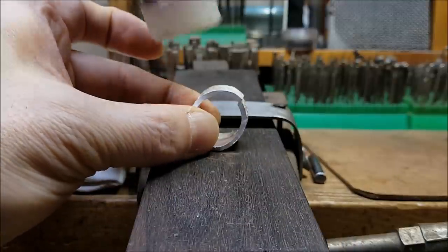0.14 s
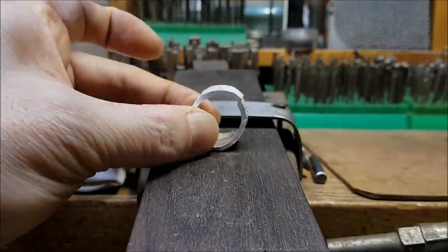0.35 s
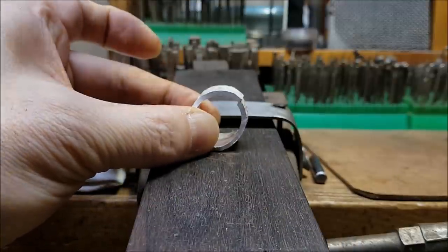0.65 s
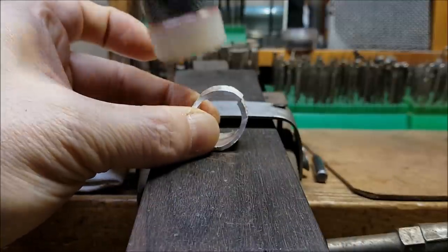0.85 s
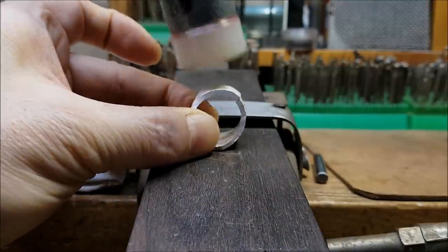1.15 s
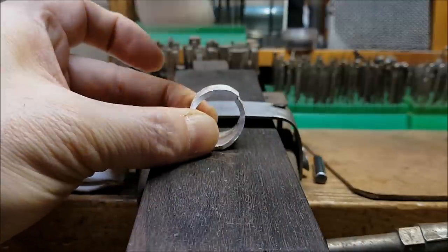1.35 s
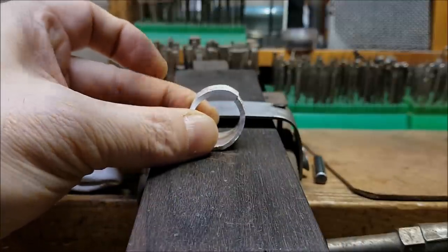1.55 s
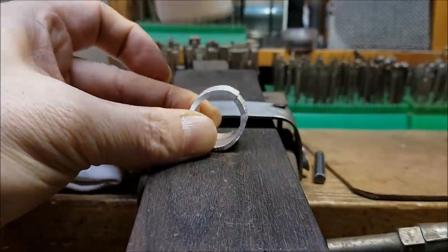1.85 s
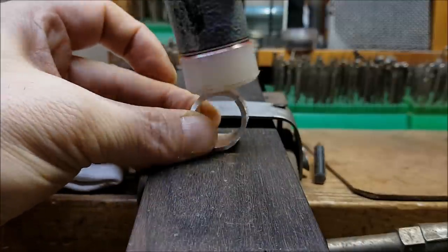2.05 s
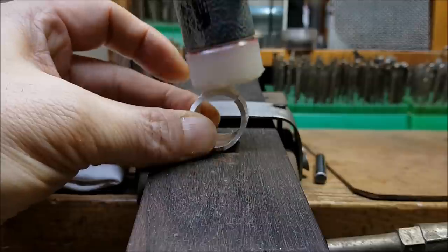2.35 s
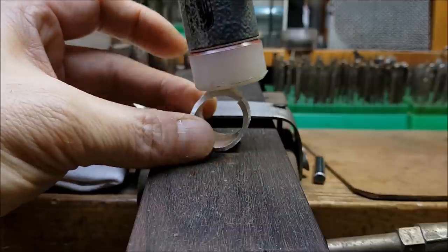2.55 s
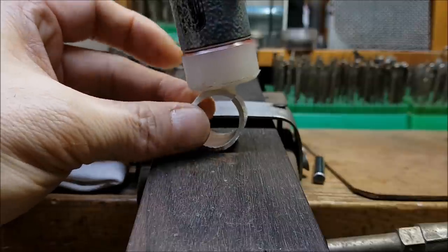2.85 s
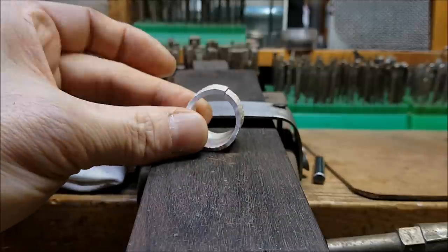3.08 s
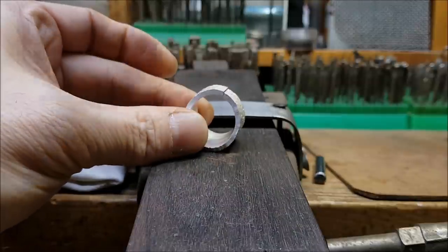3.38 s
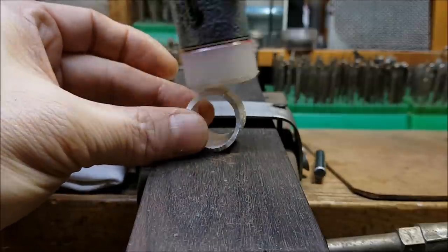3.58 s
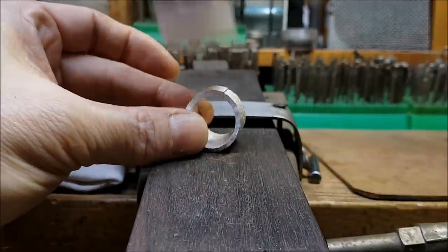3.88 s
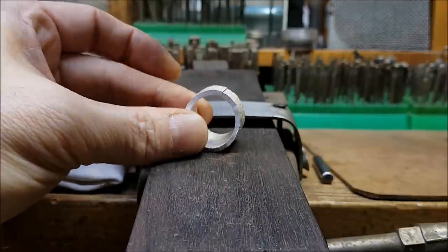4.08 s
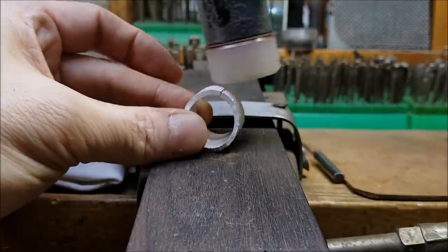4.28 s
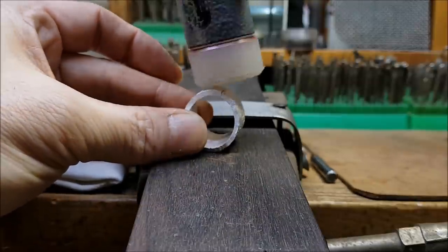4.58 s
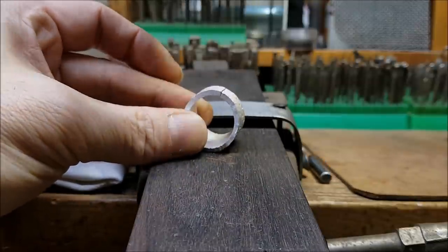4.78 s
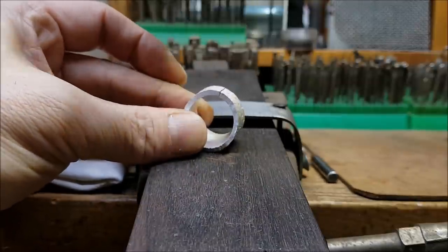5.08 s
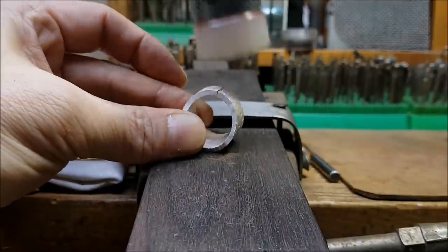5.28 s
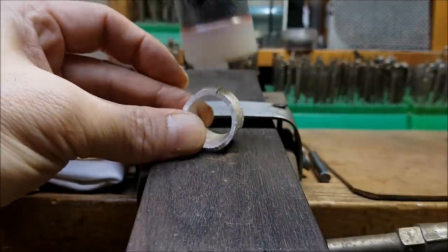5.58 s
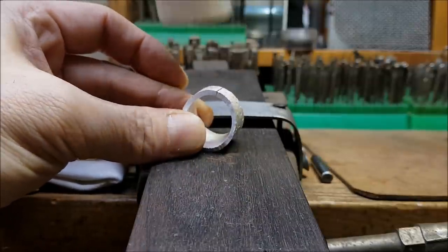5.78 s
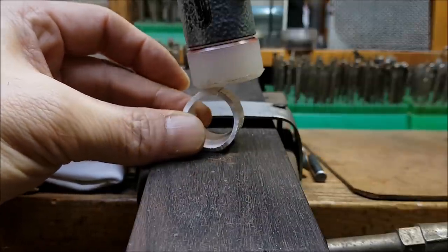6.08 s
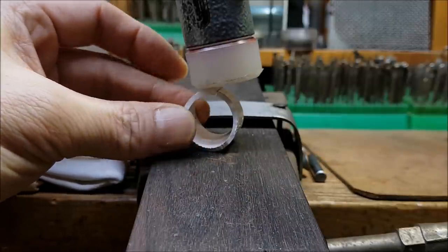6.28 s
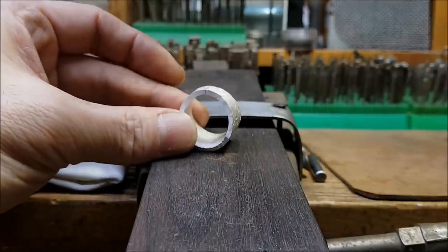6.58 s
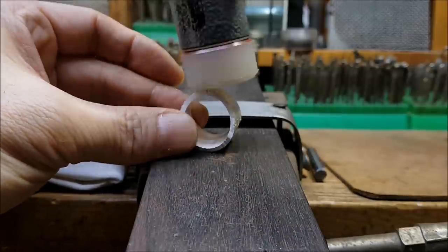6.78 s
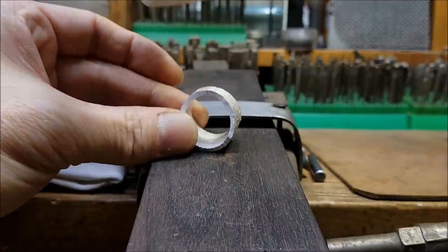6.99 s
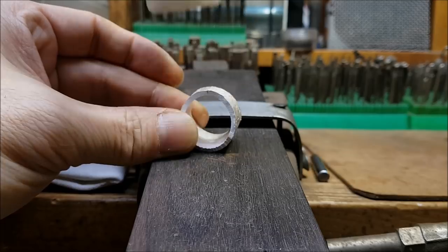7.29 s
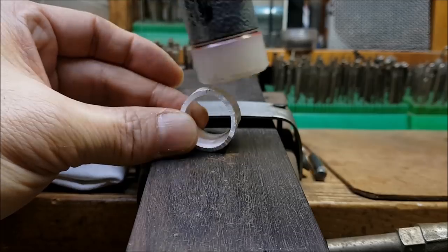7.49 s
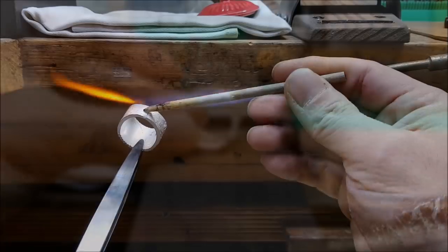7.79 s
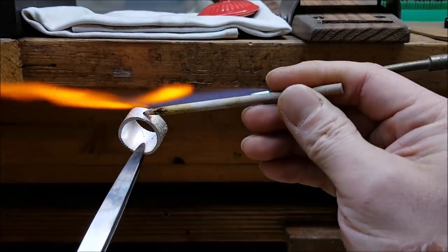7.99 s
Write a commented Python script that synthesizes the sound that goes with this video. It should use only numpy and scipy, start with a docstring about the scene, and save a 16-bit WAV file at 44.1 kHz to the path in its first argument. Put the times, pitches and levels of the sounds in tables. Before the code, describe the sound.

Close, steady mallet taps on a metal ring thump a workbench and rattle loose tools, pausing twice before a gas torch suddenly hisses.

```python
"""In a small, dry workshop, close by and a little to the left, a plastic mallet taps a silver ring on a
jeweller's wooden bench peg. Each blow clinks the ring and thumps the bench; loose steel tools then
bounce, rock and lie still. After eight blows a hand turns the ring, so the next twelve clink differently.
Near the end a gas torch starts abruptly and hisses. A faint room rumble lies under it all."""
import sys
import numpy as np
from scipy import signal
from scipy.fft import rfft, irfft, next_fast_len
from scipy.io import wavfile

SR = 44100
rng = np.random.default_rng(int(sys.argv[2]) if len(sys.argv) > 2 else 0)


def int16_out(signal):
    """Quantize to a 16-bit WAV file."""
    q = np.round(np.clip(np.atleast_2d(signal).T, -1, 1) * 32767)
    wavfile.write(sys.argv[1], SR, q.astype(np.int16))


N = 358974
T = np.arange(SR // 3) / SR  # the clock of one short sound, in seconds

# A "t60" is the time a sound takes to fade by 60 dB. Levels in the tables are relative.
# Mallet blows. Each row: start in seconds, thump in dB, clink in dB, clink brightness in dB per octave,
# the tools' first flight in seconds, each flight as a fraction of the last, first landing in dB,
# rocking time in seconds, rocking level in dB.
BLOWS = [(0.095, -15.5, -16, -10, .042, 0.7, -13, 0.22, -40.5),
         (0.4775, -13, -16, -4, 0.066, 0.63, -18.5, 0.28, -41),
         (0.793, -14.5, -18.5, -1, 0.061, 0.49, -22.5, 0.26, -44),
         (1.1051, -18.5, -18, 1.5, 0.056, 0.75, -23, 0.29, -44),
         (1.4371, -18.5, -20.5, -1, 0.048, 0.55, -31.5, .26, -43.5),
         (1.7624, -17.5, -19.5, .5, 0.067, 0.85, -32.5, 0.41, -53.5),
         (2.0793, -17, -17, 0, 0.071, 0.89, -27, 0.41, -54.5),
         (2.4033, -28.5, -25.5, -14.5, 0.025, .9, -28, 0.15, -47.5),
         (3.282, -13, -17.5, 4.5, .06, 0.78, -14.5, .24, -37),
         (3.6207, -14.5, -16.5, -1, 0.058, 0.69, -17.5, .18, -41.5),
         (3.9602, -17, -15.5, -1, 0.055, 0.67, -27.5, 0.16, -42),
         (4.2784, -17, -17.5, 0, 0.056, 0.44, -21.5, .22, -40.5),
         (4.584, -17.5, -17.5, -.5, .06, .62, -25, .14, -50),
         (4.8955, -18.5, -16, 0, .055, .74, -24.5, .15, -50.5),
         (5.212, -19.5, -20, 0.5, 0.057, .8, -26, .2, -48),
         (5.5284, -19, -18, 0.5, 0.054, 0.88, -36.5, .29, -52),
         (5.8834, -20.5, -18.5, -2.5, 0.056, 0.64, -24, .15, -46),
         (6.8124, -15, -16, -.5, 0.061, 0.3, -25, 0.11, -49),
         (7.1321, -15.5, -13.5, -3.5, 0.048, 0.37, -21.5, 0.095, -36),
         (7.4914, -15, -18.5, -1, 0.059, 0.69, -22.5, 0.16, -46)]
# Small events. Each row: start in seconds, level in dB.
RING_SHIFTS = [(3.935, -52), (3.997, -35), (5.417, -37.5)]  # the ring clicks against the peg
HAND_TOUCHES = [(2.926, -60), (5.15, -66.5), (6.265, -75), (6.44, -67.5)]  # fingers handle the ring

# Bands of the clink, each dying faster than the one below. Each row: low edge in Hz, high edge in Hz.
CLINK_BANDS = [(1800, 3600), (3600, 5500), (5500, 9000), (9000, 11500), (11500, 16000)]
# The modes (natural tones) of bench and peg.
# Each row: pitch in Hz, left level in dB, right level in dB, t60 in seconds, swell time in seconds.
BENCH_MODES = [(52, -23.5, -31, 0.38, .005), (98.6, -17, -12.5, 0.11, 0.00076), (147.35, 3, 4, 0.19, .007),
               (199.5, 4.5, 9.5, 0.15, 0.0084), (225.8, 1, 2, 0.2, 0.013), (258.7, 4, 2.5, 0.12, 0.0066),
               (317.7, 4.5, 3.5, 0.11, .012), (369.7, 4, -5.5, 0.15, 0.0029), (407.6, -11, -15, 0.19, .02),
               (462.9, 2.5, 3, 0.11, 0.011), (590.6, -10, -12, 0.15, 0.0037),
               (674, -11.5, -13.5, .18, 0.00074), (768, -18.5, -20, 0.24, 0.0091),
               (928, -12, -23.5, .22, 0.0019), (1166, -14.5, -24, 0.14, 0.0019),
               (1217, -22.5, -19, 0.051, 0.0053), (1460, -6.5, -22.5, 0.13, 0.0023)]
# Steel that sings on. Each row: pitch in Hz, level against the thump in dB, t60 in seconds.
SINGING_MODES = [(1720, -57, 1.1), (2140, -56, 1), (3570, -49, 0.36)]

# Tone colours. Each row: frequency in Hz, level at that frequency in dB.
CLINK_COLOUR = [(1800, 1), (4800, -0.5), (5200, -5.5), (6000, 0), (9000, -5.5), (14000, -6), (16000, -20)]  # the struck ring
CLICK_COLOUR = [(1500, -28.5), (3000, -3.5), (5000, -3), (9500, -1), (13000, -13), (16000, -27)]  # a light click of silver
WOOD_COLOUR = [(30, -30), (100, -11), (300, 4), (600, 2), (900, -5), (1300, -8), (1800, -11), (2600, -19),
               (5000, -40)]  # the many close modes of the wood
CLACK_COLOUR = [(60, -24), (200, 7), (380, 3), (600, -3), (1500, 2.5), (2400, 3.5), (3100, -1.5),
                (3500, -10), (4800, -10.5), (5200, -16), (7000, -14.5), (9000, -26), (13500, -25),
                (16000, -41.5)]  # a steel tool landing on wood
ROCKING_COLOUR = [(100, -10.5), (250, -1.5), (380, 1.5), (560, -2.5), (1150, 3), (2300, -2), (2800, -4),
                  (3150, -16), (3600, -18.5), (4700, -27), (8000, -29), (16000, -42.5)]  # tools rocking gently on wood
JET_COLOUR = [(40, -27), (250, -16.5), (600, -18.5), (1000, -7.5), (1700, -3.5), (3300, -1), (4700, -4),
              (5600, -4), (7600, 3), (8800, -3.5), (12000, -8), (14600, -8.5), (15200, -14), (15800, -38.5)]  # the gas jet
RUMBLE_COLOUR = [(20, -20.5), (36, -10), (53, 2.5), (65, -4.5), (80, -6), (130, -11), (200, -22),
                 (400, -33.5), (900, -64)]  # the room's rumble
AIR_COLOUR = [(100, -12), (400, -4.5), (1000, -9.5), (3000, -14), (6000, -25.5), (16000, -24)]  # the room's air noise

# Resonances. Each row: centre in Hz, width in Hz, boost in dB (a negative boost is a dip).
RING_PEAKS = [(2083, 100, 12), (2830, 240, 4.5), (4030, 320, 6), (4650, 210, 6), (7110, 250, 9.5),
              (7570, 230, 4), (11930, 1900, 4.5)]  # the ring under the mallet
FIRST_SPOT_PEAKS = [(2080, 250, -4), (3000, 600, 4), (4300, 980, -6), (13000, 2000, 10)]  # added until the ring is turned: more near 3 and 13 kHz
STEEL_PEAKS = [(920, 46, 7.5), (1600, 120, 5), (2670, 160, 10.5), (2940, 210, 8), (3970, 290, 4)]  # the steel tools
BENCH_PEAKS = [(363, 130, 8), (770, 60, 5), (920, 60, 7), (1460, 66, 4.5)]  # the bench under the rocking tools
TUBE_PEAKS = [(1910, 140, 10.5), (2260, 150, -9), (2656, 60, 11.5), (2850, 150, 7), (3466, 110, 9.5),
              (3765, 95, 12), (4360, 71, 10), (5550, 150, 7), (6130, 130, 9.5), (6530, 180, 7),
              (7200, 200, 12.5), (7500, 150, 7.5), (8400, 90, 6), (9800, 250, 9.5), (10960, 440, 6.5),
              (13000, 290, 6.5), (14000, 510, 6)]  # the torch's tube

# Left-right balance. Each row: frequency in Hz, left minus right in dB.
WORK_PAN = [(200, 0.5), (1500, 3), (2800, 7), (4200, 1), (5600, 1), (7200, 7.5), (13000, 10)]  # ring and tools
JET_PAN = [(100, -3.5), (400, 4), (1300, 0), (2400, -1), (3500, 6), (4800, 1), (7200, 13.5), (15000, 16)]  # torch
# How long the room rings. Each row: frequency in Hz, t60 in seconds.
ROOM_DECAY = [(200, 0.51), (1000, 0.068), (2800, 0.15), (6000, 0.14), (14000, 0.09)]


def silver_ring(clink_db=3, turn_s=3, pivot_hz=5500):
    """The held ring clinks briefly, its tone set by where the mallet lands; it also clicks on the peg."""
    clinks, clicks = np.zeros((2, 2, N))
    grid = np.fft.rfftfreq(len(T), 1 / SR)
    for start, _, db, tilt, *_ in BLOWS:
        modes = colour(CLINK_COLOUR, RING_PEAKS + FIRST_SPOT_PEAKS if start < turn_s else RING_PEAKS)
        tone = lambda hz: modes(hz) * amp(tilt * np.log2((hz + 1) / pivot_hz))
        shares = np.array([np.linalg.norm(tone(grid[(grid >= lo) & (grid < hi)]))
                           for lo, hi in CLINK_BANDS])
        for (lo, hi), share in zip(CLINK_BANDS, shares / np.linalg.norm(shares)):
            band = lambda hz: tone(hz) * (hz >= lo) * (hz < hi)
            clink, = bursts(band, t60=0.036 * (lo / 1800) ** -.4, rise_s=0.00027)
            add(clinks, start, amp(db + clink_db) * share * clink)
    for start, db in RING_SHIFTS:
        click, = bursts(colour(CLICK_COLOUR), t60=0.04, rise_s=0.0012)
        add(clicks, start, amp(db) * click)
    return in_room(panned(clinks, WORK_PAN), wet_db=-8) + panned(clicks, WORK_PAN)


def bench(modes_db=-1, knock_db=2, boom_db=-5, boom_peak_s=.021, split_hz=580):
    """Each blow shakes the same bench modes; neighbours start in opposite directions, so the thump swells."""
    out = np.zeros((2, N))
    hz, left_db, right_db, t60, swell_s = np.transpose(BENCH_MODES)
    signs = (-1) ** np.arange(len(hz))[:, None]
    modes = signs * np.sin(2 * np.pi * hz[:, None] * T) * rise_and_fade(t60[:, None], swell_s[:, None])
    size = (len(BLOWS), 2, len(T))
    wood = colour(WOOD_COLOUR)
    highs = lambda f: 1 / (1 + (split_hz / (f + 1)) ** 8)
    knocks = noise(lambda f: wood(f) * highs(f), size) * rise_and_fade(t60=0.13, rise_s=0.011)
    # long bending waves are slow, so the low boom spreads over the bench top later
    late_swell = (T / boom_peak_s * np.exp(1 - T / boom_peak_s)) ** 3
    booms = noise(lambda f: wood(f) * (1 - highs(f)) * (f > 240), size) * late_swell
    for (start, db, *_), knock, boom in zip(BLOWS, knocks, booms):
        tones = amp(np.array([left_db, right_db]) + rng.standard_normal(len(hz))) @ modes
        thump = amp(modes_db) * tones + amp(knock_db) * knock + amp(boom_db) * boom
        add(out, start, amp(db) * thump)
    return out


def bouncing_tools(landings=6, shortest_flight_s=.019, pitch_spread=0.04, dull_db=-28):
    """Each blow throws the tools up; they land ever sooner and softer, each time on another edge."""
    out = np.zeros((2, N))
    steel = colour(CLACK_COLOUR, STEEL_PEAKS)
    for start, _, _, _, first_flight_s, rebound, first_db, *_ in BLOWS:
        shrink = rebound ** np.arange(landings)
        flights = first_flight_s * shrink
        gains = amp(first_db) * shrink ** 2.39  # a shorter flight lands much more softly
        pitches = np.exp(pitch_spread * rng.standard_normal(landings))
        knocks = bursts(colour(ROCKING_COLOUR, BENCH_PEAKS), t60=.06, rise_s=.0004, count=landings)
        for delay, flight, gain, pitch, knock in zip(np.cumsum(flights), flights, gains, pitches, knocks):
            clack, = bursts(lambda hz: steel(hz / pitch), t60=0.028, rise_s=0.0003)
            if flight > shortest_flight_s:
                # the knock weakens more slowly than the clack, so soft landings sound duller
                add(out, start + delay, gain * clack + amp(dull_db) * gain ** .4 * knock)
    return out


def rocking_tools(wait_s=0.05, fall_db=6, scatter_db=2):
    """The tools rock in soft, dull knocks until they lie still."""
    out = np.zeros((2, N))
    for start, *_, rocking_s, level_db in BLOWS:
        delays = wait_s + np.cumsum(rng.uniform(.016, .032, size=18))
        levels_db = level_db + fall_db * (.5 - delays / rocking_s)
        levels_db += scatter_db * rng.standard_normal(len(delays))
        knocks = bursts(colour(ROCKING_COLOUR, BENCH_PEAKS), t60=0.077, rise_s=.0005, count=len(delays))
        for delay, db, knock in zip(delays, levels_db, knocks):
            if delay < rocking_s:
                add(out, start + delay, amp(db) * knock)
    return out


def torch(start_s=7.647, opening_s=0.0018, jet_db=-21.5):
    """Gas rushes steadily through the nozzle and whistles faintly in the torch's tube."""
    opened = np.clip((np.arange(N) / SR - start_s) / opening_s, 0, 1)
    hiss = noise(colour(JET_COLOUR, TUBE_PEAKS), (2, N))
    return amp(jet_db) * opened * panned(hiss, JET_PAN)


def singing_steel(width_hz=45):
    """Steel on the bench loses its energy slowly, so it sings on faintly after each thump."""
    out = np.zeros((2, N))
    t = np.arange(2 * len(T)) / SR
    for hz, db, t60 in SINGING_MODES:
        tones = noise(lambda f: peak(f, hz, width_hz), (len(BLOWS), 2, len(t))) * fade(t, t60)
        for (start, thump_db, *_), tone in zip(BLOWS, tones):
            add(out, start, amp(thump_db + db) * tone)
    return out


def hand():
    """Fingers press the ring onto the wood with a slow, muffled bump."""
    out = np.zeros((2, N))
    for start, db in HAND_TOUCHES:
        bump, = bursts(colour(WOOD_COLOUR), t60=0.093, rise_s=.008)
        add(out, start, amp(db) * bump)
    return out


def workshop(steady_db=-65, swell_db=-49, fall_db_per_s=17, air_db=-81):
    """A low rumble, nearly alike on both sides, settles to a steady level, with very faint air noise."""
    level = amp(steady_db) + amp(swell_db - fall_db_per_s * np.arange(N) / SR)
    shared = noise(colour(RUMBLE_COLOUR), (1, N))
    sides = amp(-9) * noise(colour(RUMBLE_COLOUR), (2, N))
    return level * (shared + sides) + amp(air_db) * noise(colour(AIR_COLOUR), (2, N))


def in_room(x, wet_db):
    """Adds quick echoes from bench top and walls, which differ in detail from moment to moment."""
    out = x.copy()
    for first in range(0, N, len(T)):
        hz, t, spectrum = signal.stft(rng.standard_normal((2, len(T))), SR, nperseg=256)
        tail = signal.istft(spectrum * fade(t, along(ROOM_DECAY, hz)[:, None]), SR, nperseg=256)[1]
        tail = np.pad(tail / np.linalg.norm(tail[0]), ((0, 0), (SR // 400, 0)))  # arrives 2.5 ms late
        echoes = signal.fftconvolve(x[:, first:first + len(T)], tail, axes=1)
        add(out, first / SR, amp(wet_db) * echoes)
    return out


def bursts(response, t60, rise_s, count=1):
    """Short stereo bursts of noise, like many close modes struck at once, all equal in energy."""
    shape = rise_and_fade(t60, rise_s)
    shape = shape[:len(T) // 5] / shape.max()
    x = noise(response, (count, 2, len(shape))) * shape
    return x * np.linalg.norm(shape) / np.linalg.norm(x, axis=-1, keepdims=True)


def amp(db):
    """Turns decibels into a gain."""
    return 10 ** (np.asarray(db) / 20)


def fade(t, t60):
    """Falls by 60 dB every t60 seconds."""
    return np.exp(-np.log(1000) * t / t60)


def rise_and_fade(t60, rise_s):
    """The outline of a knock: it builds up, then dies away."""
    return (1 - np.exp(-T / rise_s)) * fade(T, t60)


def along(points, hz):
    """Reads between a table's rows on a logarithmic frequency scale."""
    frequencies, values = np.transpose(points)
    return np.interp(np.log(hz + 1), np.log(frequencies + 1), values)


def peak(hz, centre, width):
    """The hump of one resonance, 1 at its centre."""
    return 1 / (1 + (2 * (hz - centre) / width) ** 2)


def colour(points, peaks=()):
    """Gain by frequency: a smooth curve plus its resonances."""
    return lambda hz: amp(along(points, hz) + sum(db * peak(hz, f, width) for f, width, db in peaks))


def filtered(x, response):
    """Scales each frequency in x by the gain that response gives it."""
    size = x.shape[-1]
    padded = next_fast_len(size + 4096)
    return irfft(rfft(x, padded) * response(np.fft.rfftfreq(padded, 1 / SR)), padded)[..., :size]


def noise(response, shape):
    """Coloured noise with an average (rms) level of 1."""
    x = filtered(rng.standard_normal(shape), response)
    return x / np.sqrt(np.mean(x ** 2) + 1e-20)


def panned(x, balance):
    """Turns the right side down, mostly in the treble."""
    return filtered(x, lambda hz: np.array([np.ones_like(hz), amp(-along(balance, hz))]))


def add(track, start_s, sound):
    """Mixes a sound into the track at its start time."""
    part = track[..., max(round(start_s * SR), 0):][..., :sound.shape[-1]]
    part += sound[..., :part.shape[-1]]


def scene():
    """All sources together, left and right."""
    blows = bench() + silver_ring()
    tools = in_room(panned(bouncing_tools() + rocking_tools(), WORK_PAN), wet_db=-7)
    return blows + tools + singing_steel() + hand() + torch() + workshop()


def record(dry, ceiling=0.96, top_hz=16000):
    """Rounds off the highest peaks and cuts the treble above top_hz."""
    rounded = dry / (1 + np.abs(dry / ceiling) ** 6) ** (1 / 6)
    return filtered(rounded, lambda hz: 1 / (1 + (hz / top_hz) ** 120))


dry = scene()
out = record(dry)
int16_out(out)
```